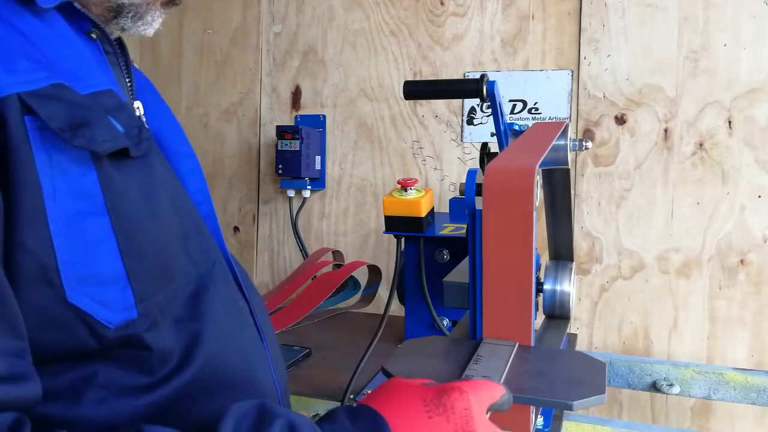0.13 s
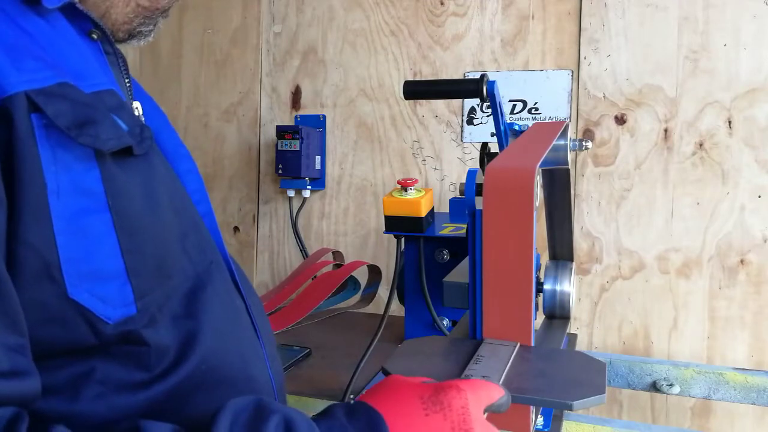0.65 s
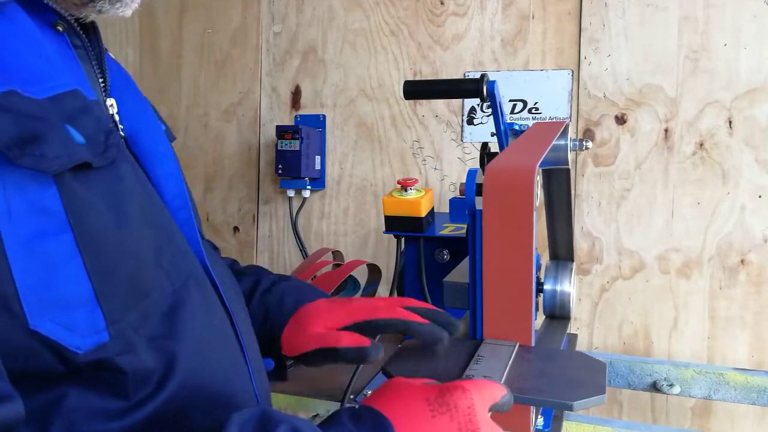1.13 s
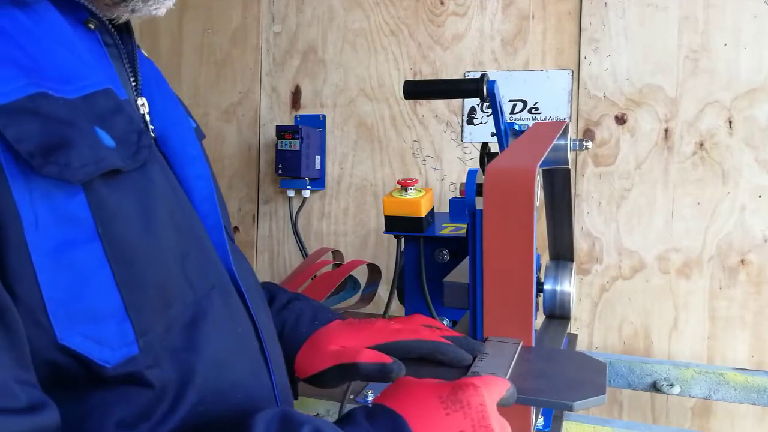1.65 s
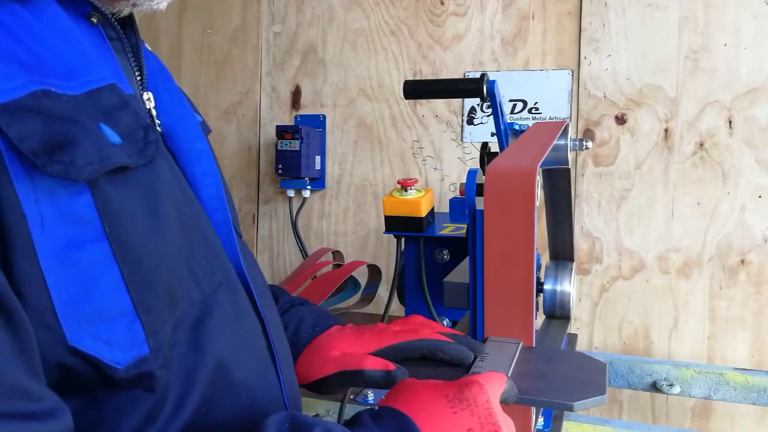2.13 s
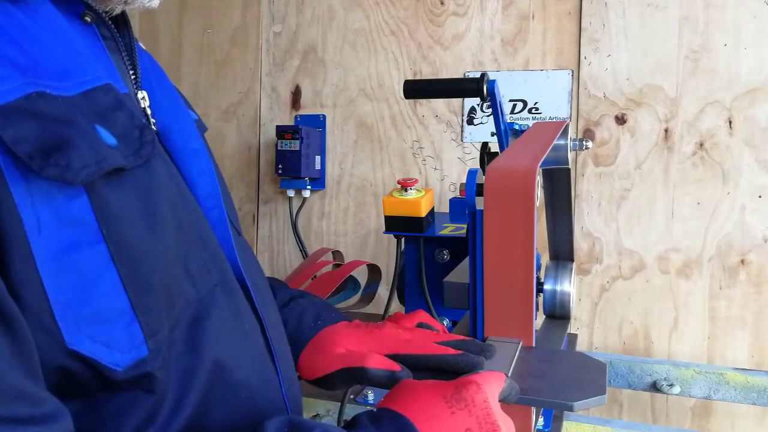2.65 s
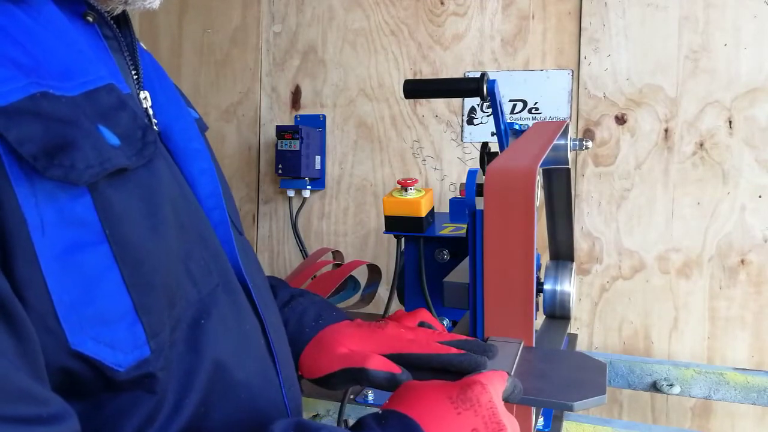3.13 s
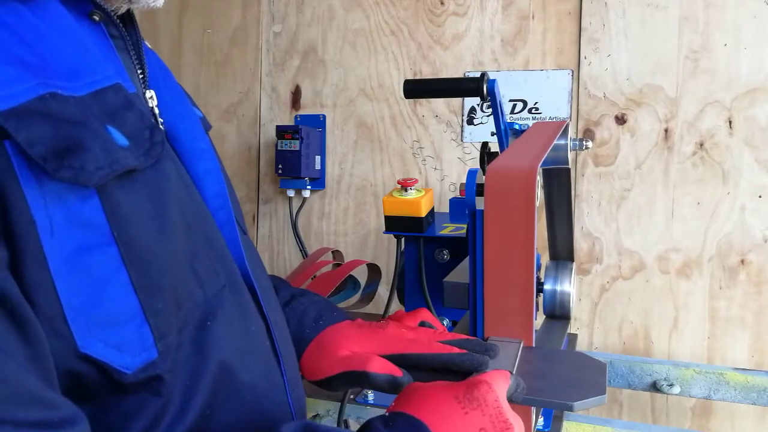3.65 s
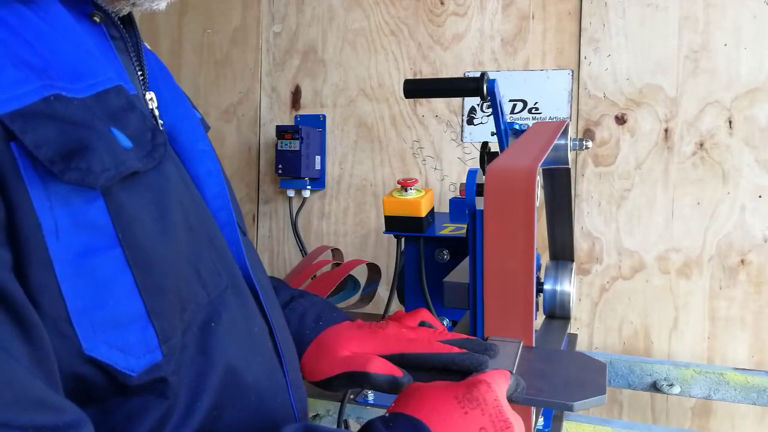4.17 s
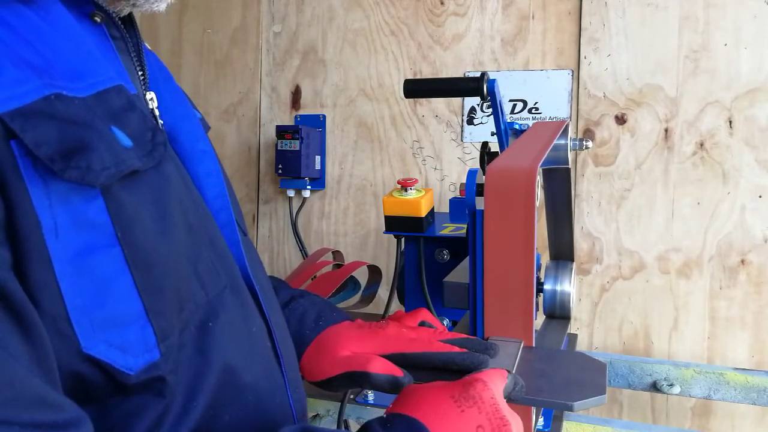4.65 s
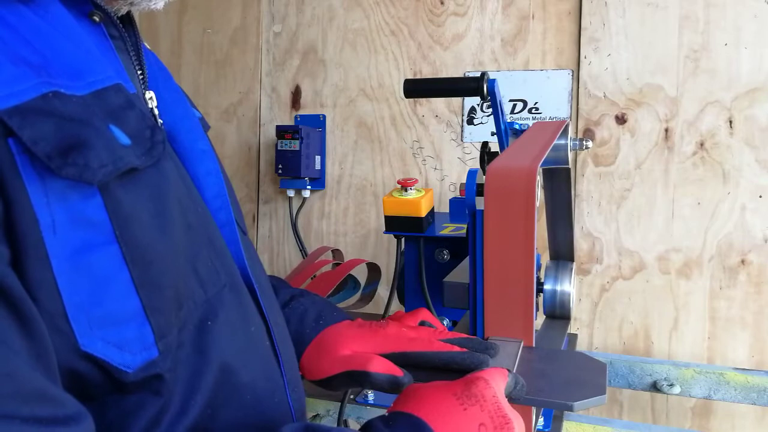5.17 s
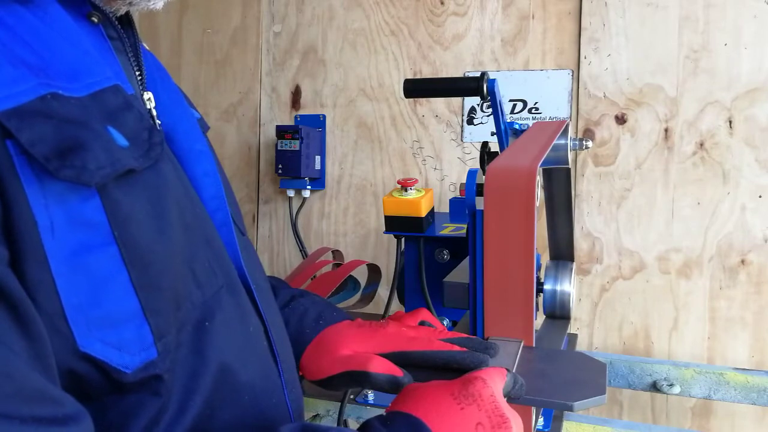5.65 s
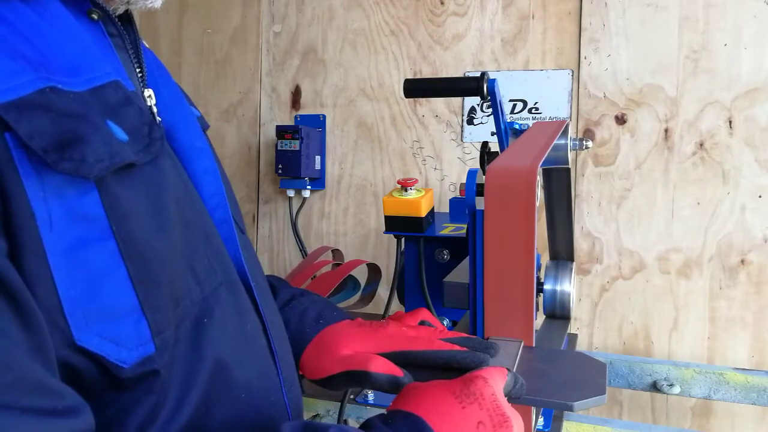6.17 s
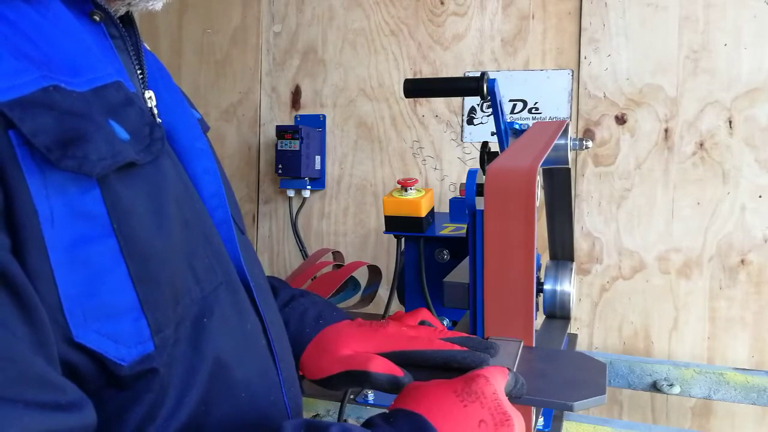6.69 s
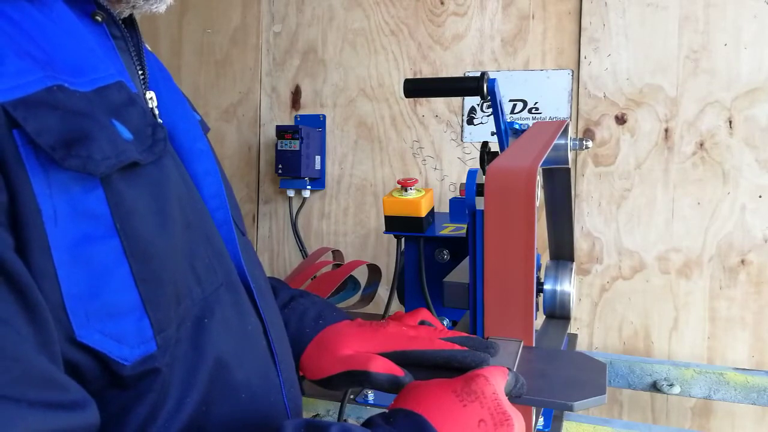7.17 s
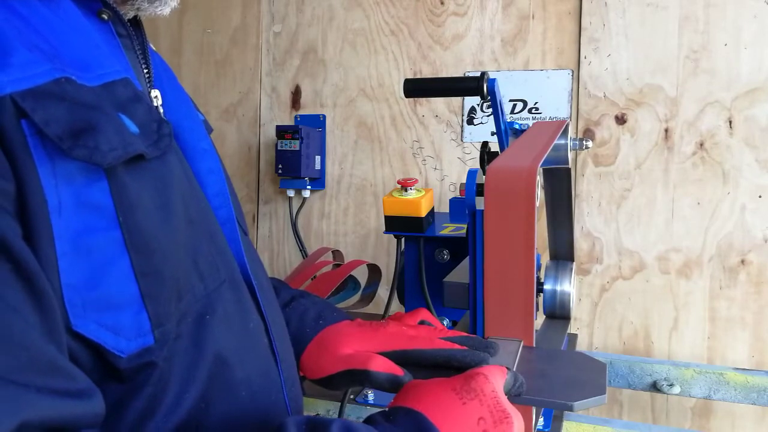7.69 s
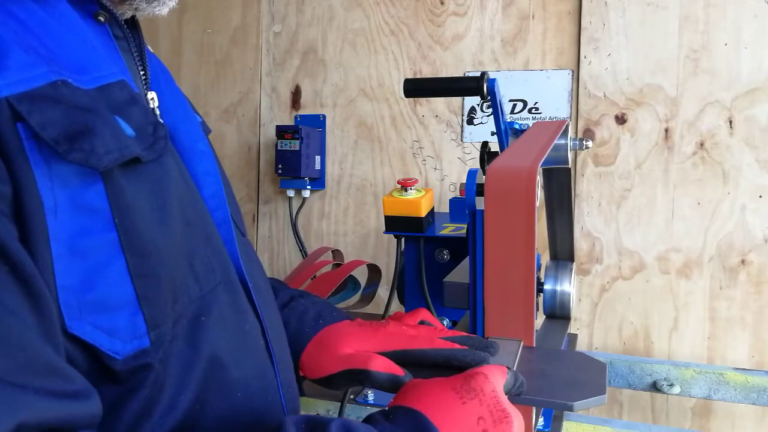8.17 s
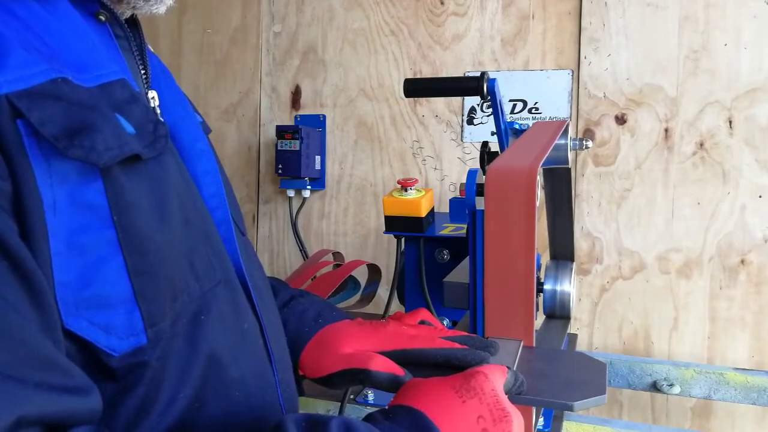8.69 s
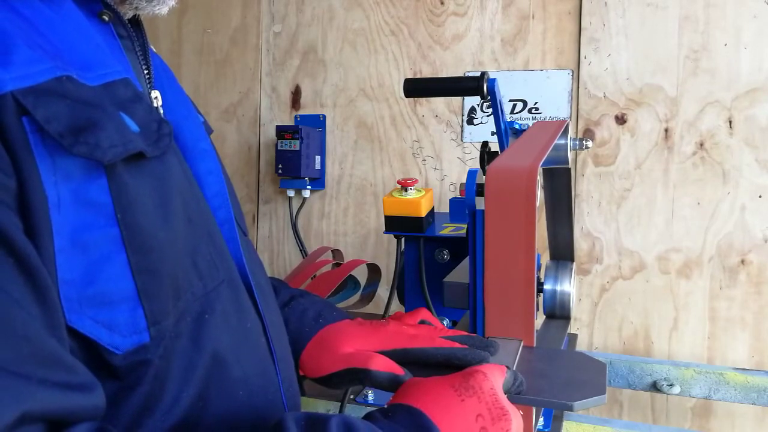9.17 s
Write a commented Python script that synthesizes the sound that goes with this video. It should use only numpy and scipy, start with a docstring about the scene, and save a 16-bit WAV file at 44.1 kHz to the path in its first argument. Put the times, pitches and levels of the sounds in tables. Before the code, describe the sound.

A belt grinder runs free with a steady rushing hiss and faint whine, then a steel bar presses in with harsh, ringing grinding and buffeting air.

```python
"""Steel bar on a belt grinder

A belt grinder runs free in a plywood-lined workshop, then a steel bar is pushed against the belt.
Noise from the rubbing grit, partly repeating with every belt turn, excites resonances of bar and work rest.
Free-running wheels and frame colour the same kind of noise, under a thin whine of motor and bearings.
Air thrown off the belt buffets two microphone ports as bursts of low noise with a few single slaps;
the bar's edge snags with a few sharp pressure dips, most of them at first touch."""
import sys
import numpy as np
from scipy import signal
from scipy.fft import rfft, irfft
from scipy.io import wavfile
from scipy.ndimage import uniform_filter1d, map_coordinates

SR = 44100
rng = np.random.default_rng(int(sys.argv[2]) if len(sys.argv) > 2 else 0)


def elevation(decibels):
    """Turn decibel levels (scalar or array-like) into linear amplitude ratios."""
    levels = np.asarray(decibels, float)
    return 10 ** (levels / 20)


def unload_wav(signal):
    """Save mono or channel-first audio to the path in sys.argv[1] as 16-bit WAV at rate SR, clipped to [-1, 1]."""
    wavfile.write(
        sys.argv[1],
        SR,
        np.round(np.clip(np.atleast_2d(signal).T, -1, 1) * 32767).astype(np.int16),
    )


N = 410571
TIME = np.arange(N) / SR
BINS_HZ = np.maximum(np.arange(N // 2 + 1) * SR / N, 1)
CELLS, TURNS = 4096, 180  # patches of grit around the belt, turns of belt drawn

# Contact of bar and belt. Each row: time in seconds, bar ring in dB, scrape in dB, rasp in dB,
# low ring over bar ring in dB, spray over scrape in dB.
CONTACT = [(1.76, -35, -33, -40, -1, -1), (1.9, -33.5, -30.5, -34, 0.5, -1), (2.0, -33, -28.5, -36, 2, -1),
           (2.15, -31.5, -31.5, -39, 1.5, -2), (2.35, -30.5, -29.5, -35, -0.5, -1),
           (2.53, -30.5, -28, -33, 1, 1), (2.7, -31.5, -30, -36, 1, 0), (2.9, -29.5, -29, -34, 0, 3),
           (3.08, -29.5, -29, -35, -1.5, 4), (3.25, -29, -29.5, -36, -1, 4), (3.4, -29.5, -30, -35.5, 0, 3),
           (3.8, -31, -30, -34, 0.5, 4), (3.98, -28, -26.5, -32.5, 0.5, 2), (4.35, -29, -28, -33, 0, 1.5),
           (4.7, -29, -29, -33, -0.5, 1), (4.87, -28.5, -26.5, -33.5, 0.5, 0),
           (5.1, -29, -29.5, -33.5, -0.5, 0), (5.7, -28, -28, -32, -0.5, 0),
           (6.8, -28.5, -30, -33, -0.5, 0.5), (7.3, -29, -29.5, -32.5, -0.5, 1),
           (7.9, -27.5, -28, -29.5, -0.5, -1), (8.6, -28.5, -30, -31.5, -0.5, -2),
           (9.31, -27, -31, -30.5, -0.5, -1)]
# Broad spectrum of the contact. Each row: frequency in Hz, relative density in dB per Hz.
CONTACT_COLOUR = [(240, -16), (400, -16), (866, -7.5), (1020, -8), (1230, -5), (1340, -5.5), (2040, -4.5),
                  (2200, -3), (2580, -1), (4420, -7), (4900, -10.5), (5590, -13), (6750, -9.5),
                  (9440, -13.5), (13000, -1.5)]
# Resonances of bar and work rest. Each row: frequency in Hz, width in Hz, height over the colour in dB.
BAR_MODES = [(1006, 35, 5), (1050, 50, 3), (1206, 40, 4), (1260, 40, 3.5), (1310, 40, -4), (1405, 30, 3),
             (1480, 60, 2), (1790, 40, -3), (1900, 40, 3), (1940, 40, -6), (2075, 45, 6), (2205, 115, -10),
             (2321, 45, 7), (2400, 50, -2), (2538, 22, 8), (2600, 40, -2), (2660, 70, 3), (2735, 30, -4),
             (2774, 30, 7), (3024, 60, 6), (3290, 60, 2), (3341, 45, 6), (3500, 80, 3), (3680, 80, -6),
             (3770, 70, 5), (3870, 80, 2), (4050, 70, 2), (4216, 35, 7), (4290, 50, -3), (4450, 120, -7),
             (4887, 80, 8), (5610, 80, -2), (6683, 120, 3), (7100, 500, 2), (8420, 200, 4), (8750, 350, 2),
             (9250, 400, -2), (12700, 500, 4)]
# Steadiest lines of the ring. Each row: multiple of the belt turn, level at the right port in dB against
# the low ring, left minus right in dB.
CHATTER = [(65, -18.5, -11), (67, -28, 0), (68, -29, -3), (77, -27, -6), (78, -23.5, -4), (81, -25, -8),
           (91, -27, -3), (107, -31, -2)]


def grind(force):
    """Forced resonance: rubbing rings the bar low, with scrape, spray, rasp and sizzle in higher bands."""
    ring_db, scrape_db, rasp_db, low_ring_db, spray_db = curve(CONTACT)
    from_first_snag = np.abs(TIME - SNAGS[0][0])
    # the bar rings louder as it lands, and fresh grit sizzles louder at first touch
    ring_db = ring_db + 7 * np.exp(-from_first_snag / 0.013)
    sizzle_db = -19.5 + 0.32 * (scrape_db - scrape_db.mean())
    sizzle_db = sizzle_db + 6.5 * np.exp(-from_first_snag / 0.03)

    # neighbouring bands share the power at each crossover
    gain = resonant(CONTACT_COLOUR, BAR_MODES)
    to_ring, to_scrape, to_rasp = below(5000), below(8230), below(9050)

    bar = gripped(force, gain * to_ring)
    bar_low = irfft(rfft(bar) * below(1430), N)
    bar_to_middle = irfft(rfft(bar) * below(3000), N)
    bar_middle = bar_to_middle - bar_low
    bar_high = bar - bar_to_middle
    # the steady lines grow in as the contact settles
    chatter = np.interp(TIME, [1.9, 2.6], [0, 1]) * tones(CHATTER, belt_place() / CELLS, 1.4)
    # the middle ring is held back until the bar lies flat
    bed_db = np.interp(TIME, [2.15, 2.45], [-3, 0])
    low_bite = elevation(0.84 * walk(10) + 1.7 * patches(count=13))
    ring = elevation(low_ring_db) * (low_bite * bar_low + chatter)
    ring = ring + elevation(bed_db + 0.5 * flicker(22) + 1.0 * patches(count=5)) * bar_middle
    ring = ring + elevation(0.4 * flicker(30) + 1.1 * patches(count=7)) * bar_high

    grit = colour(force, gain * to_scrape * np.sqrt(1 - to_ring ** 2))
    grit_low = irfft(rfft(grit) * below(7000), N)
    spray = elevation(spray_db + 1.7 * flicker(25)) * (grit - grit_low)
    scrape = elevation(scrape_db + 0.5 * patches(count=8)) * (elevation(1.0 * flicker(30)) * grit_low + spray)

    rasp = colour(force, gain * to_rasp * np.sqrt(1 - to_scrape ** 2))
    rasp = elevation(rasp_db + 2.3 * flicker(22) + 0.5 * patches(count=8)) * rasp
    sizzle = colour(force, gain * np.sqrt(1 - to_rasp ** 2))
    sizzle = elevation(sizzle_db + 1.0 * flicker(22) + 1.4 * patches(count=20)) * sizzle

    touch = np.clip((TIME - CONTACT[0][0] - 0.012) / 0.0018, 0, 1)
    return touch * (elevation(ring_db) * ring + scrape + rasp + sizzle)


def gripped(force, gain):
    """Boundary damping: as the hands shift, alternate modes of the bar swell while their neighbours sink."""
    strong = [mode for mode in BAR_MODES if mode[2] > 0]
    sway = [(hz, 1.5 * width, 4 * (-1) ** k) for k, (hz, width, _) in enumerate(strong)]  # 4 dB each way
    freed = resonant([(1, 0), (SR, 0)], sway)
    one, other = colour(force, gain * freed), colour(force, gain / freed)
    grip = 0.5 + 0.5 * np.tanh(walk(3))
    return grip * one + (1 - grip) * other


# The bar's edge snags on the belt. Each row: time in seconds, right port's depth in dB,
# right port's decay in milliseconds.
SNAGS = [(1.7726, -12, .6), (1.7785, -16, .5), (1.7809, -17, .4), (1.8078, -24, .6), (1.8232, -29, .6),
         (1.8855, -28, .6), (1.9658, -27, .6), (2.0358, -5.5, .4), (2.6967, -21, .4)]


def snags():
    """Impulsive radiation: each snag is a pressure dip, sharp at the near right, later and rounder at left."""
    out = np.zeros((2, N))
    for s, peak_db, decay_ms in SNAGS:
        span = slice(int(s * SR), int(s * SR) + 1000)
        t, decay_s = TIME[span] - s, decay_ms / 1000
        out[0, span] += elevation(peak_db - 5) * dip(t - 0.00045, 0.0003, 1.6 * decay_s)
        out[1, span] += elevation(peak_db) * dip(t, 0.00006, decay_s)
    return out


def dip(t, rise_s, decay_s):
    """Relaxation: pressure drops quickly and recovers exponentially; depth 1."""
    t = np.maximum(t, 0)
    shape = (1 - np.exp(-t / rise_s)) * np.exp(-t / decay_s)
    return -shape / shape.max()


# Rubbing that comes back on the next turn. Each row: frequency in Hz, share of power (0-1) while grinding,
# share of power (0-1) running free.
REPEAT = [(400, .5, .45), (1100, .65, .45), (1300, .55, .5), (1600, .3, .55), (2000, .35, .55),
          (4500, .35, .6), (7000, .06, .3), (13000, .03, .1)]
# Rubbing heard by both ports. Each row: frequency in Hz, share of power (0-1).
DIRECT = [(400, .55), (1200, .45), (3000, .4), (6500, .35), (11000, .35)]
# Phase between the ports. Each row: frequency in Hz, lead of the left port in radians.
LEFT_LEADS = [(0, 3), (340, 1.5), (860, -2.0), (2150, -1.5), (2580, -2), (3360, -4.5), (5080, -5),
              (6550, -5.5), (7670, -8.5), (9650, -11), (9910, -10), (10300, -12), (12700, -19),
              (14000, -18.8)]
# Balance of the ports. Each row: frequency in Hz, left minus right in dB.
LEFT_MINUS_RIGHT = [(400, -6), (670, -2.5), (1230, -6.5), (2260, 0), (3400, -5), (4400, -2), (5500, -4),
                    (7000, 0), (8400, -1), (10000, -0.5), (13000, -5)]


def at_ports(keep, column):
    """Partial coherence: one part reaches both ports by different paths, wheels and walls add each its own."""
    share, direct = over_hz(np.array(REPEAT)[:, [0, column]]), over_hz(DIRECT)
    lead = np.interp(BINS_HZ, *np.transpose(LEFT_LEADS))
    both = belt_surface(keep, share) * np.array([np.exp(1j * lead), np.ones(len(BINS_HZ))])
    own = np.array([belt_surface(keep, share), belt_surface(keep, share)])
    lean = elevation(np.outer([0.5, -0.5], over_hz(LEFT_MINUS_RIGHT)))
    return irfft(lean * (np.sqrt(direct) * both + np.sqrt(1 - direct) * own), N)


def belt_surface(keep, share):
    """Cyclic excitation: slowly wearing grit returns each turn, plus fresh chance; returns a spectrum."""
    fresh = rng.standard_normal((TURNS, CELLS))
    grit = signal.lfilter([np.sqrt(1 - keep ** 2)], [1, -keep], fresh, axis=0)
    settled = grit[20:].ravel()
    returning = colour(map_coordinates(settled, [belt_place()], order=1), 1)
    return np.sqrt(share) * rfft(returning) + np.sqrt(1 - share) * rfft(rng.standard_normal(N))


# Belt speed, slower under load. Each row: time in seconds, turns a second in Hz.
BELT_SPEED = [(0, 15.84), (1.77, 15.84), (2.0, 15.57), (2.7, 15.55), (3.5, 15.485), (4.2, 15.45),
              (4.8, 15.5), (5.6, 15.475), (6.4, 15.48), (7.7, 15.455), (8.05, 15.4), (8.5, 15.415),
              (8.8, 15.39), (9.31, 15.39)]


def belt_place():
    """Kinematics: belt speed integrated to the number of cells that have run past."""
    return np.cumsum(curve(BELT_SPEED)[0]) / SR * CELLS


def patches(count):
    """Periodic modulation: stretches of belt bite harder or softer, turn after turn; spread near 1."""
    bite = rng.standard_normal(count)
    bite = (bite - bite.mean()) / bite.std()
    return np.interp(belt_place(), np.arange(count) * CELLS / count, bite, period=CELLS)


# Free-running belt and wheels. Each row: time in seconds, level in dB.
IDLE = [(0, -25), (1.7, -25)]
# Broad spectrum of the rush. Each row: frequency in Hz, relative density in dB per Hz.
IDLE_COLOUR = [(180, -38), (300, -56.5), (405, -25), (438, -17), (640, -15), (1550, -11.5), (1810, -8),
               (2600, -10.5), (4380, -10), (4810, -9), (5380, -8), (7030, 0), (13000, -6)]
# Resonances of wheels and frame. Each row: frequency in Hz, width in Hz, height over the colour in dB.
FRAME_MODES = [(1760, 35, 8), (1820, 40, -4), (1884, 35, 7), (1965, 30, 7), (2230, 50, -5), (2299, 40, 5),
               (2370, 60, -6), (2439, 40, 3), (2590, 80, -3), (2697, 40, 4), (2850, 250, 4), (3090, 50, 2),
               (3250, 150, 4), (3429, 40, 4), (3537, 40, 6), (3620, 70, -6), (3736, 40, 2), (3978, 40, 5),
               (4075, 50, 5), (4264, 50, 6), (4330, 40, -4), (4393, 35, 5), (4480, 70, -4), (4581, 35, 4),
               (4650, 70, -5), (4786, 70, 4), (5055, 120, 3), (5373, 50, 5), (5530, 70, 5), (5705, 50, 4),
               (5920, 150, 2), (6880, 80, 5), (7830, 80, 4)]
# Whine of motor and bearings while unloaded. Each row: frequency in Hz, right port's level in dB rms,
# left minus right in dB.
WHINE = [(407, -58.5, 2.5), (571.3, -67, -1), (654, -66, 0), (734.4, -69, 0), (5515, -55, 0),
         (5520, -55, 0), (6880, -55, 0)]


def idle(force):
    """Structural radiation: belt rush over wheels and platen, damped by the bar, with tones that sink."""
    unloaded = np.interp(TIME, [1.775, 1.8], [1, 0])
    level_db = curve(IDLE)[0] - 7 * (1 - unloaded)
    level_db = level_db + 0.44 * walk(8.47) + 0.56 * patches(count=12)
    rush = elevation(level_db) * colour(force, resonant(IDLE_COLOUR, FRAME_MODES))
    # the free-running wheels lean less to the right than the contact
    lean = elevation(1.6 * np.array([[0.5], [-0.5]]))
    return lean * rush + unloaded * tones(WHINE, TIME, 1.0)


def tones(lines, clock, waver_db):
    """Line spectrum: wavering sines at multiples of a clock; port phase differs more the higher the line."""
    out = 0
    for times, db, left_db in lines:
        cycles = times * clock
        mean_khz = cycles[-1] / TIME[-1] / 1000
        phase = 2 * np.pi * cycles + rng.standard_normal((2, 1)) * mean_khz + 0.6 * walk(3)
        level_db = db + np.array([[left_db], [0]]) + waver_db * walk(4.034)
        out = out + np.sqrt(2) * elevation(level_db) * np.sin(phase)
    return out


# Single strong eddies. Each row: time in seconds, left peak in dB, right peak in dB,
# lateness of the right port in milliseconds, width in milliseconds.
SLAPS = [(5.3143, -13, -18, .6, .5), (5.3228, -13, -16, .5, .5), (8.5730, -11, -8, -.4, .5),
         (8.6044, -13, -15, .5, .5), (8.6685, -11, -14, .5, .8)]


def slaps():
    """Convected pressure: a short hump between two shallow troughs passes one port after the other."""
    out = np.zeros((2, N))
    for s, left_db, right_db, late_ms, width_ms in SLAPS:
        span = slice(int(s * SR) - 400, int(s * SR) + 400)
        late_s = np.array([[0], [late_ms / 1000]])
        u = (TIME[span] - s - late_s) / (width_ms / 1000)
        hump = 1.5 * np.exp(-u ** 2 / 2) - 0.5 * np.exp(-u ** 2 / 18)
        out[:, span] += elevation(np.array([[left_db], [right_db]])) * hump
    return out


# Broad spectrum of the draught. Each row: frequency in Hz, relative density in dB per Hz.
DRAUGHT_COLOUR = [(12, -46), (20, 1.5), (80, 0.5), (112, -1), (252, -2), (297, -3.5), (376, -4.5),
                  (900, -13.5), (1100, -30), (1430, -21), (2420, -120)]


def draught():
    """Turbulence: eddies cross from left port to right; strong gusts and those from the left are brighter."""
    level_db, pan_db = gusts()
    gain, deep, broad = elevation(over_hz(DRAUGHT_COLOUR)), below(139, order=2), below(535, order=2)
    bursts = elevation(2.5 * walk(120))
    delay_s = np.array([[0], [0.00059]])
    shared = rfft(bursts * rng.standard_normal(N)) * np.exp(-2j * np.pi * BINS_HZ * delay_s)
    eddies = irfft(shared, N) + 0.38 * bursts * rng.standard_normal((2, N))
    rumble = colour(eddies, gain * deep)
    buffet = colour(eddies, gain * broad * np.sqrt(1 - deep ** 2))
    flutter = colour(eddies, gain * np.sqrt(1 - broad ** 2))
    # pressure peaks of the buffet are sharper than its troughs
    buffet = buffet + 0.11 * (buffet ** 2 - uniform_filter1d(buffet ** 2, SR // 100))

    side_db = np.array([pan_db, -pan_db]) / 2
    gust_db = level_db + 38.0  # above a middling gust
    bright_db = 0.98 * np.maximum(pan_db, 0)  # lean to the left
    dull_db = 3 * np.clip(pan_db, -4, 0)  # lean to the right
    # the upper buffet is dull in gusts that lean right, bright in those that lean left
    thud = irfft(rfft(buffet) * below(285, order=2), N)
    buffet = thud + elevation(-2.5 + 1.47 * bright_db + dull_db) * (buffet - thud)

    rumble = elevation(-11.0 - 0.65 * gust_db) * rumble
    buffet = elevation(0.26 * side_db - bright_db / 2) * buffet
    flutter = elevation(side_db + bright_db + dull_db - 20.5 + 0.4 * gust_db) * flutter
    return elevation(level_db) * (rumble + buffet + flutter)


# Gusts on the ports. Each row: peak time in seconds, peak level in dB, rise in seconds, fall in seconds,
# lean (left minus right) in dB.
GUSTS = [(.07, -27, 0.087, 0.052, -5), (.28, -52, .04, 0.041, -1), (1.1, -42, 0.15, 0.087, -3),
         (1.66, -47.5, 0.13, 0.071, -4), (2.04, -46, .03, 0.028, -2), (2.67, -37.5, 0.021, 0.04, -14),
         (2.9, -47, .04, .04, 2), (3.29, -40.5, .04, 0.085, -1), (3.63, -40, 0.18, 0.074, 0),
         (3.95, -41.5, 0.15, .03, -3), (4.46, -44.5, .07, 0.11, 4), (4.87, -39, 0.034, 0.07, 3),
         (5.12, -29, 0.2, 0.22, 8), (5.33, -23.5, 0.05, 0.033, 7.5), (5.571, -30, 0.15, 0.17, 3),
         (5.99, -32.5, 0.092, 0.087, 1), (6.18, -33.5, 0.18, 0.13, 0.5), (6.82, -34.5, 0.099, 0.055, 7),
         (7.08, -30, 0.16, 0.3, 7.5), (7.441, -32, 0.059, 0.15, 1.5), (7.68, -29.5, 0.056, 0.037, 4),
         (7.89, -30, 0.18, 0.11, 1), (8.15, -41, 0.027, .04, -4), (8.36, -42, 0.066, 0.063, -2),
         (8.585, -23, 0.078, 0.051, 4), (8.66, -26, 0.051, 0.066, 2), (8.84, -36.5, 0.11, 0.062, 0),
         (8.99, -32, 0.11, 0.052, -1), (9.11, -25.5, 0.033, 0.06, 3), (9.25, -36, 0.082, .12, 1)]


def gusts():
    """Power summation: level and lean of bell-shaped, long-skirted gusts over a calm that favours the right."""
    power = elevation(2 * (-52 + 0.5 * walk(13)))
    lean = power * np.where(TIME < CONTACT[0][0], -4, -26)  # dB, free and with the bar on the belt
    for s, peak_db, rise_s, fall_s, pan_db in GUSTS:
        side_s = np.where(TIME < s, rise_s, fall_s)
        gust = elevation(2 * peak_db) / (1 + ((TIME - s) / side_s) ** 2) ** 3
        power, lean = power + gust, lean + pan_db * gust
    return 10 * np.log10(power), lean / power


def workshop(x, t60_s, wet_db):
    """Reverberation: a short decaying noise tail from the plywood walls, different at each port."""
    t = np.arange(SR // 4) / SR
    tail = rng.standard_normal((2, len(t))) * np.exp(-np.log(1000) * t / t60_s)
    tail = tail / np.sqrt(np.sum(tail ** 2, axis=1, keepdims=True))
    return x + elevation(wet_db) * signal.fftconvolve(x, tail, axes=1)[:, :N]


def curve(table):
    """Linear interpolation: columns of a time table, one value a sample."""
    s, *columns = np.transpose(table)
    return [np.interp(TIME, s, c) for c in columns]


def over_hz(table):
    """Logarithmic frequency interpolation: a (Hz, value) table at every bin."""
    hz, value = np.transpose(table)
    return np.interp(np.log(BINS_HZ), np.log(hz), value)


def colour(x, gain):
    """Linear filtering: a gain for each bin, result scaled to rms 1 over all ports."""
    y = irfft(rfft(x) * gain, N)
    return y / np.sqrt(np.mean(y ** 2))


def resonant(spectrum, modes):
    """Modal response: gain of a broad colour with bell-shaped resonances on it."""
    db = over_hz(spectrum)
    for hz, width, mode_db in modes:
        db = db + mode_db / (1 + (2 * (BINS_HZ - hz) / width) ** 2)
    return elevation(db)


def below(hz, order=8):
    """Butterworth response: gain of a low-pass without phase shift."""
    return 1 / np.sqrt(1 + (BINS_HZ / hz) ** (2 * order))


def walk(rate):
    """Random modulation: levels held 1 / rate seconds and smoothed twice; spread near 1."""
    k = int(SR / rate)
    held = np.repeat(rng.standard_normal(N // k + 1), k)
    return 1.46 * uniform_filter1d(uniform_filter1d(held, k), k)[:N]


def flicker(rate):
    """High-passed modulation: a walk without its slow drift."""
    w = walk(rate)
    return 1.35 * (w - uniform_filter1d(w, SR // 8))


def scene():
    """Superposition: machine in the room; draught, slaps and snags straight on the microphone."""
    machine = idle(at_ports(keep=0.62, column=2)) + grind(at_ports(keep=0.69, column=1))
    return workshop(machine, t60_s=0.23, wet_db=-11) + draught() + slaps() + snags()


def band_limit(x):
    """A steep low-pass at the top of the band."""
    return signal.sosfilt(signal.butter(12, 14460, fs=SR, output="sos"), x)


def record(dry):
    """Band limiting: the microphone drops the deepest bass, the recorder cuts the top sharply."""
    dry = signal.sosfilt(signal.butter(1, 25, "high", fs=SR, output="sos"), dry)
    dry = irfft(rfft(dry) * below(13070, order=800), N)
    return band_limit(dry)


dry = scene()
out = record(dry)
unload_wav(out)
```